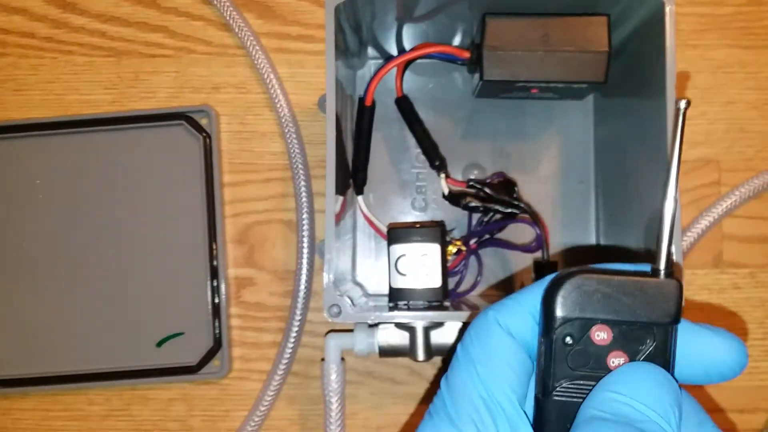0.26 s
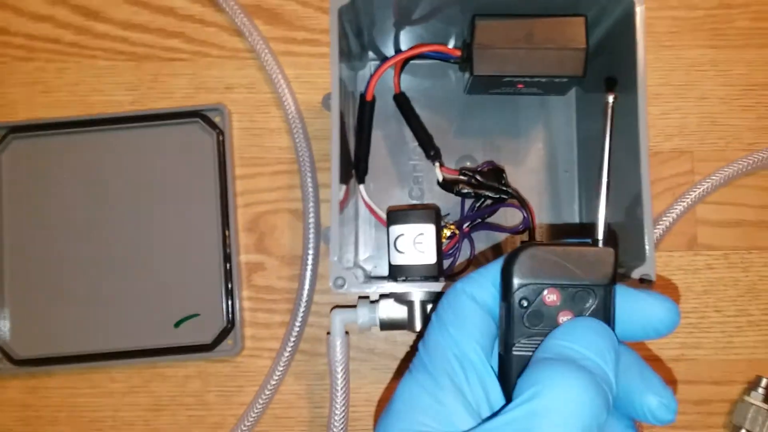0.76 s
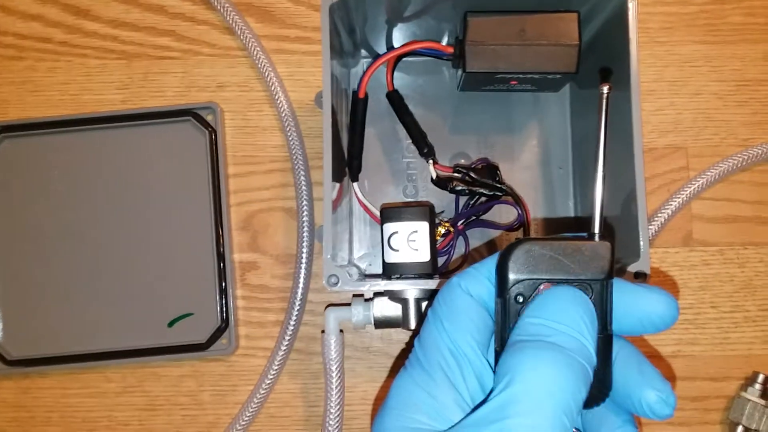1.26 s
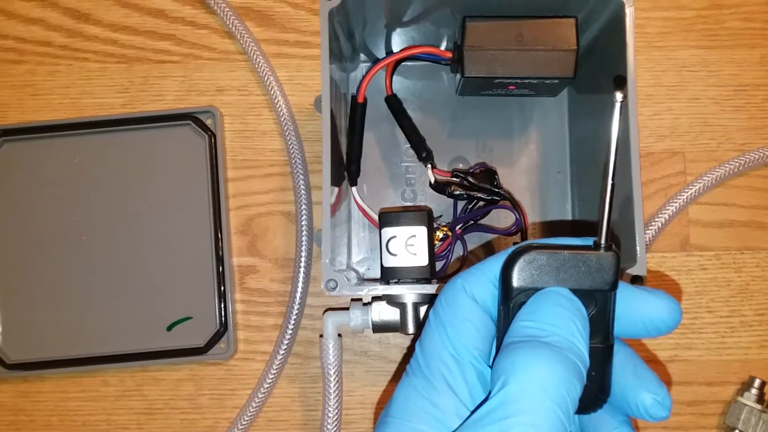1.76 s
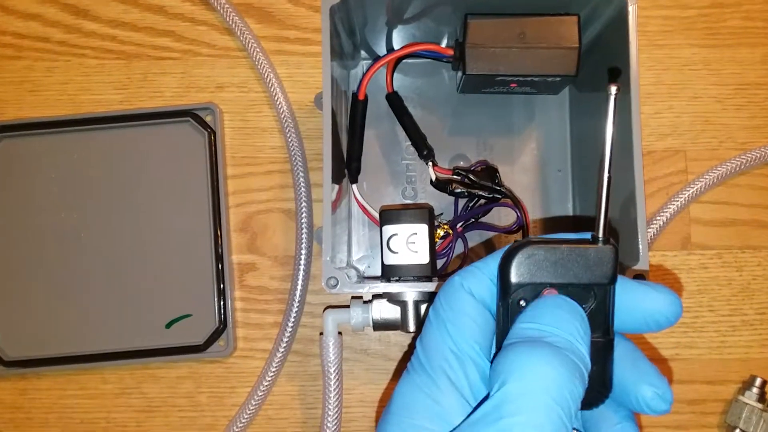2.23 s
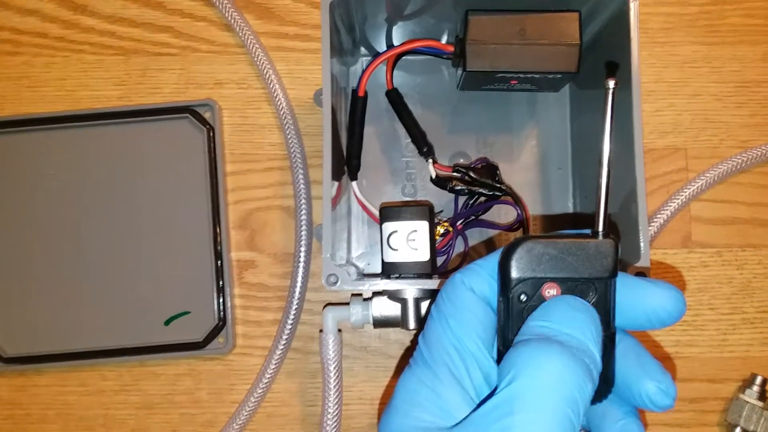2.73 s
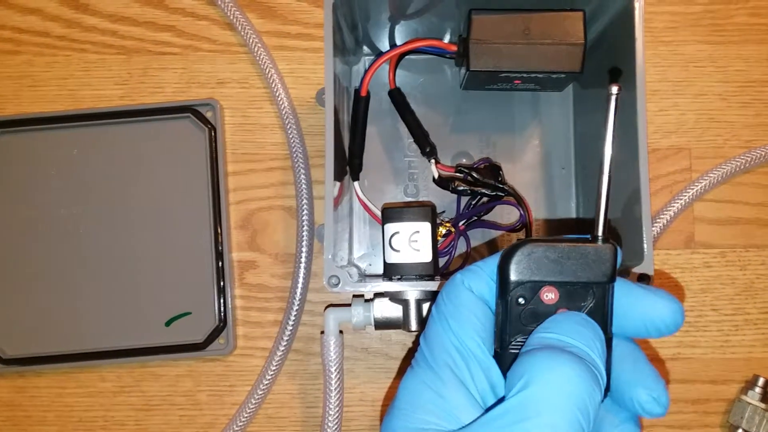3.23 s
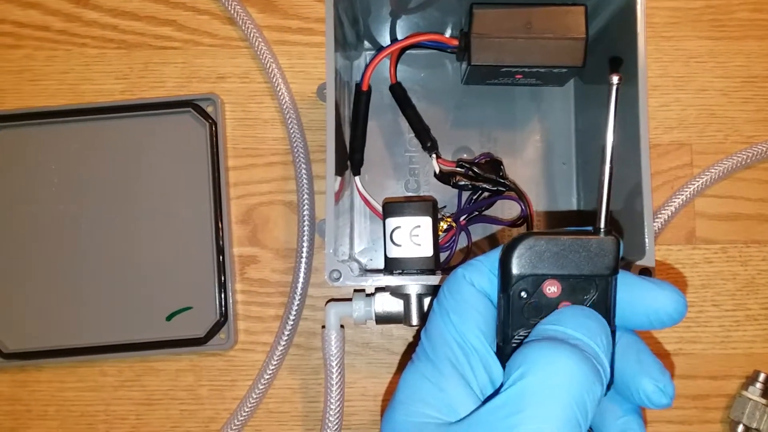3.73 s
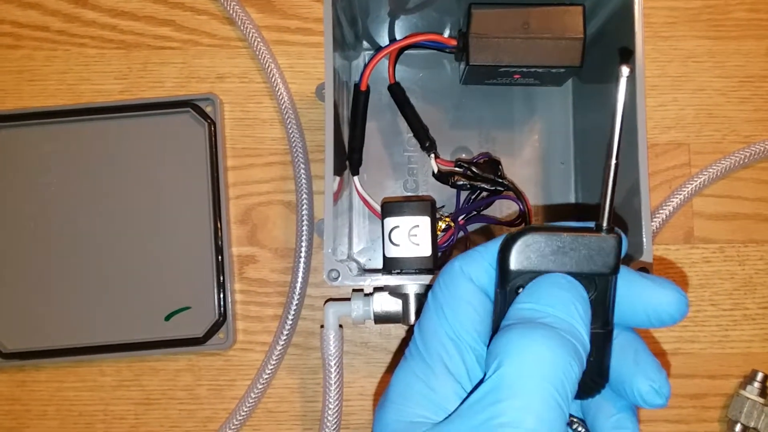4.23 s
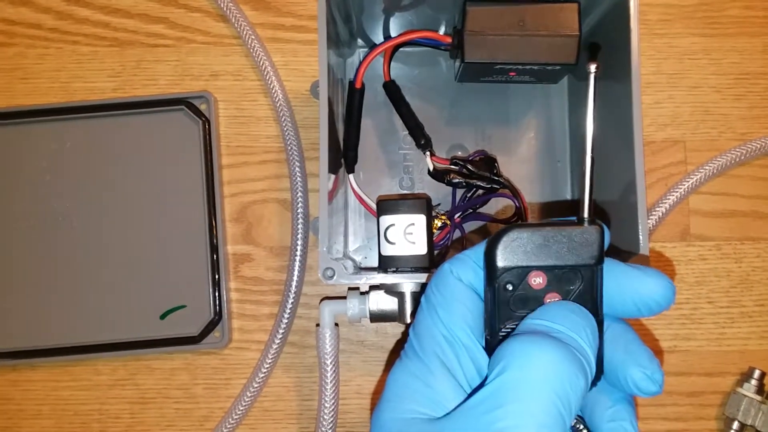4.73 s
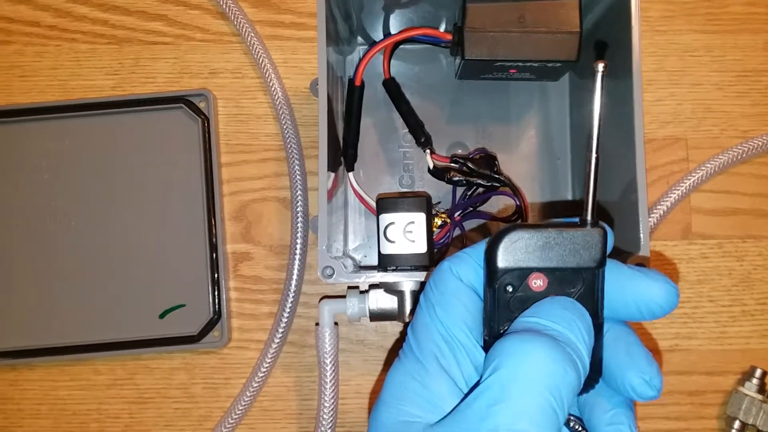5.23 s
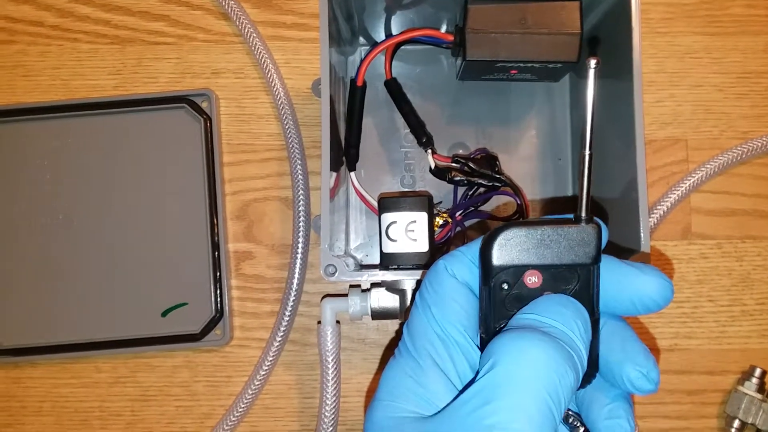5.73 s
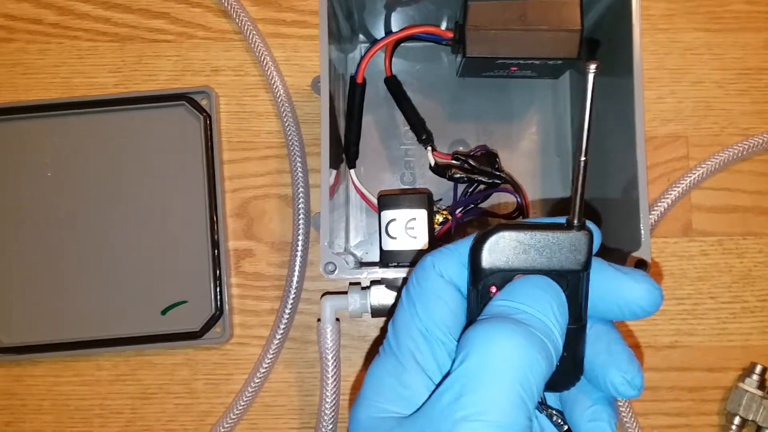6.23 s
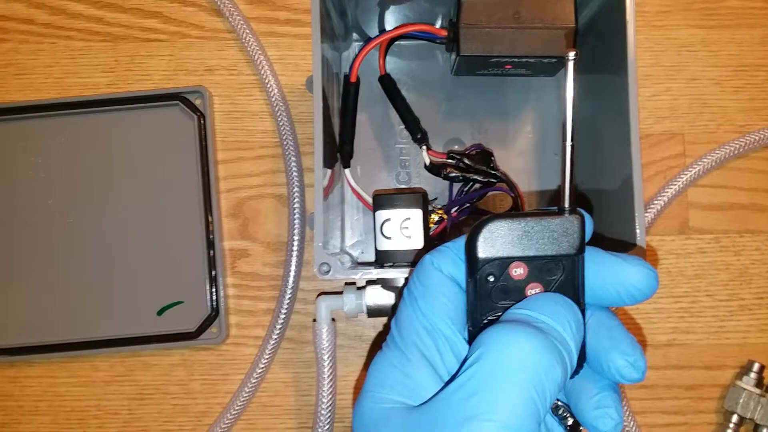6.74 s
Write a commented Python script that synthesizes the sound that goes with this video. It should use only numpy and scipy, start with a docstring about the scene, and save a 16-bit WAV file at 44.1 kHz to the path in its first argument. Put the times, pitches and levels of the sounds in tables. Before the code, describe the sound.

In a small quiet room with low rumble, faint hum and hiss, a gloved thumb presses a hollow plastic remote close to a stereo microphone. The first press gives only a click. Later presses trigger a relay and valve: a dry metallic clack on shutting, then a louder clack with a short sputtering air burst on opening. Shutting and opening alternate, ending with another air spit.

```python
"""Low rumble, mains hum and hiss come first, then the creaks of a glove close to a stereo microphone.
A gloved thumb clicks the buttons of a small remote over a workbench: dome ticks and case knocks.
A relay in an open plastic box answers and switches a solenoid valve, both made of ringing modes and noise:
it shuts with a dry clack and opens with a clack and a short spit of compressed air, shaped noise.
A small room rings after all but the background, the bench echo and the puff on the microphone."""
import sys
import numpy as np
from scipy import signal
from scipy.fft import rfft, irfft, next_fast_len
from scipy.io import wavfile
from scipy.ndimage import uniform_filter1d, map_coordinates

SR = 44100
rng = np.random.default_rng(int(sys.argv[2]) if len(sys.argv) > 2 else 0)


def master(y):
    """Save y as 16-bit WAV."""
    cut = np.clip(np.atleast_2d(y).T, -1, 1)
    pcm = np.round(cut * 32767)  # scale
    wavfile.write(sys.argv[1], SR, pcm.astype(np.int16))


N = 307773

# the remote's hollow plastic case: (frequency [Hz], relative level [dB])
CASE_SPECTRUM = [(200, -35.5), (600, -43.5), (950, -29.5), (1180, -15), (1350, -6), (1750, -1.5),
                 (1870, -2.5), (2000, 3), (2200, 2), (2450, -3.5), (2750, -16), (4000, -27), (7000, -44.5),
                 (16000, -52.5)]
# steel on steel: (frequency [Hz], relative level [dB])
STEEL_SPECTRUM = [(300, -14.5), (900, -10.5), (1600, 1.5), (4000, 2.5), (6000, -2), (9000, -7),
                  (11000, -12), (13000, -15), (16000, -23)]
# the valve body and the box it is bolted to: (frequency [Hz], relative level [dB], 60 dB decay [s])
VALVE_BOX_MODES = [(458, -10, .042), (505, -10, 0.05), (620, -17, 0.048), (980.7, -20.5, 0.093),
                   (1305, -7, 0.14), (1447, -10.5, 0.097), (1630, -7, 0.015), (1823, -6, .07),
                   (2125, -11, .03), (2533, -7, 0.08), (2696, -12, 0.036), (3760, 3, 0.033),
                   (3610, 1.5, 0.0085), (4270, -11.5, 0.0081), (4880, -21.5, 0.16), (5860, -5, 0.03)]
# the thumb slides onto a button, pushes it down and lets it spring back: (down [s], up [s],
# relative case knock [dB], tick down [dB], tick up [dB], slide [dB])
BUTTON_PRESSES = [(1.9199, 2.135, -13, -39.5, -49, -87), (3.0362, 3.1841, -10, -33, -38, -81.5),
                  (4.3465, 4.522, -8, -35, -36, -91.5), (5.3089, 5.5172, -10.5, -30, -34, -89),
                  (6.2617, 6.4345, -11, -35.5, -38.5, -92)]
# the relay pulls in and the valve opens: (time [s], relative force [dB], relative puff on the microphone [dB])
VALVE_OPENINGS = [(4.4141, -19.5, -5.5), (6.3296, -19, -20)]
# the relay drops out and the valve shuts: (time [s], relative force [dB])
VALVE_SHUTTINGS = [(3.0992, -20), (5.4013, -21)]
# the plunger lands after the relay: the coil pulls it fast, the spring returns it slowly
OPEN_TRAVEL_S, SHUT_TRAVEL_S = 0.0081, 0.0218


def amp(db):
    """Decibels to gain."""
    return 10 ** (np.asarray(db) / 20)


def unit(x):
    """Scaled to rms 1."""
    return x / np.sqrt(np.mean(x ** 2) + 1e-20)


def along(points, hz):
    """(frequency [Hz], value) points read on a log frequency axis."""
    f, v = np.transpose(points)
    return np.interp(np.log(hz + 1), np.log(f + 1), v)


def pan(db):
    """Left and right gains for a left-right difference."""
    return amp([[db / 2], [-db / 2]])


def clock():
    """Half a second of time, the life of one event."""
    return np.arange(SR // 2) / SR


def wander(t, rate):
    """Smooth random values at times t, drawn at this many new points a second."""
    points = rng.standard_normal(int(t[-1] * rate) + 4)
    return map_coordinates(points, [t * rate])


def add(track, s, x):
    """Mix x into the track at s seconds."""
    part = track[:, round(s * SR):][:, :x.shape[-1]]
    part += x[..., :part.shape[1]]


def filtered(x, response):
    """x times a complex response of frequency."""
    n = x.shape[-1]
    m = 2 * next_fast_len(n // 2 + SR // 8)  # room for the filter's tail
    return irfft(rfft(x, m) * response(np.fft.rfftfreq(m, 1 / SR)), m)[..., :n]


def coloured(x, spectrum):
    """x through the causal, minimum-phase filter that has this spectrum."""
    def response(hz):
        # folding the cepstrum onto positive times makes the filter causal
        cepstrum = irfft(np.log(amp(along(spectrum, hz))))
        cepstrum[1:len(hz) - 1] *= 2
        cepstrum[len(hz):] = 0
        return np.exp(rfft(cepstrum))
    return filtered(x, response)


def tilted(x, slope_db):
    """x made brighter or duller, approaching this many dB per octave above 1 kHz."""
    return filtered(x, lambda hz: amp(slope_db * np.log2(1 + hz / 1000)))


def burst(t60, alike):
    """Stereo noise that dies away; part of it is common to both sides."""
    noise = rng.standard_normal((3, SR // 2))
    share = np.clip(alike, 0, 1)
    stereo = np.sqrt(share) * noise[0] + np.sqrt(1 - share) * noise[1:]
    return stereo * amp(-60 * clock() / t60)


def sized(x, db):
    """A click whose energy equals 4 ms at this rms level."""
    energy = np.sum(np.mean(x ** 2, axis=0))
    return amp(db) * x / np.sqrt(energy / (.004 * SR))


def ring(modes, apart):
    """Struck modes at slightly new strengths; the two ports hear each one a little out of phase."""
    t, out = clock(), 0
    for hz, db, t60 in modes:
        phase = rng.uniform(0, 2 * np.pi) + apart * rng.standard_normal((2, 1))
        level = amp(db + rng.standard_normal() - 60 * t / t60)
        out = out + level * np.sin(2 * np.pi * hz * t + phase)
    return out * (1 - np.exp(-t / 0.00026))


def in_room(x, wet_db, early_db):
    """x with early reflections from bench and box, then the room's tail, both as decaying noise."""
    # how long the room rings: (frequency [Hz], 60 dB decay [s])
    room_decay = [(150, 0.13), (600, 0.53), (1500, 0.34), (3500, .35), (4900, 0.39), (6500, 0.4),
                  (15000, 0.19)]
    hz, t, z = signal.stft(rng.standard_normal((2, SR // 2)), SR, nperseg=256)
    decay = amp(-60 * t / along(room_decay, hz)[:, None])
    tail = signal.istft(z * decay, SR, nperseg=256)[1][:, :SR // 2]
    tail = tail * (1 - np.exp(-clock() / 0.0075))  # builds up more slowly than the early reflections
    early = burst(t60=0.032, alike=0.18) * (1 - np.exp(-clock() / 0.0015))
    answer = amp(wet_db) * tail / np.linalg.norm(tail[0])
    answer = answer + amp(early_db) * early / np.linalg.norm(early[0])
    return x + signal.fftconvolve(x.mean(0)[None], answer, axes=1)[:, :x.shape[1]]


def background():
    """Low room rumble and microphone hiss as shaped noise; a slightly unsteady hum as drifting sines."""
    # rumble and hiss: (frequency [Hz], relative density [dB per Hz])
    floor_spectrum = [(12, -47), (20, -15), (110, -2), (168, -12), (357, -20.5), (422, -24.5), (590, -25),
                      (759, -27.5), (5080, -41.5), (8410, -30), (12100, -33.5), (13900, -28), (16000, -36)]
    # how far the two ports agree: (frequency [Hz], left-right likeness [-1 to 1])
    floor_likeness = [(60, 0.84), (240, 0.83), (950, 0.015), (3770, -0.36), (15000, -0.02)]
    # the left port hisses more: (frequency [Hz], left-right difference [dB])
    port_balance = [(100, 2.5), (2000, -1), (4400, 0.5), (8100, 12), (15000, 13)]
    # hum: (frequency [Hz], relative level [dB])
    hum_tones = [(118.4, -60), (236.9, -72), (290.7, -75), (349.9, -76.5)]

    def mid_side(hz):
        turn = np.arccos(np.clip(along(floor_likeness, hz), 0, 1)) / 2  # likeness below 0 counts as 0
        return amp(along(floor_spectrum, hz)) * [np.cos(turn), np.sin(turn)]

    def balance(hz):
        lean = np.arctan(amp(along(port_balance, hz)))
        return np.sqrt(2) * np.array([np.sin(lean), np.cos(lean)])

    mid, side = filtered(rng.standard_normal((2, N)), mid_side)
    noise = amp(-61.0) * unit(np.array([mid + side, mid - side]))
    t, hum = np.arange(N) / SR, 0
    for hz, db in hum_tones:
        level = amp(db - 2 + 2 * wander(t, rate=4.2))
        hum = hum + level * np.sin(2 * np.pi * hz * t + 0.42 * wander(t, rate=2))
    return filtered(noise + hum, balance)


def rubs():
    """The creaks and the slide before each press: (time [s], level [dB], length [s], pitch [Hz])."""
    # the glove creaks on the remote's case: (time [s], level [dB], length [s], pitch [Hz])
    creaks = [(.129, -80.5, .053, 1930), (.847, -85, .15, 1350), (1.091, -78.5, .089, 1580),
              (1.624, -63, 0.026, 1700), (2.263, -61, 0.018, 1520), (4.302, -69, .016, 2050),
              (4.601, -44.5, 0.012, 1746), (6.046, -72, 0.04, 1750)]
    lead_s, slide_s, slide_hz = .4, 0.37, 1620  # the slide's start before the press, length, pitch
    return creaks + [(down - lead_s, db, slide_s, slide_hz) for down, *_, db in BUTTON_PRESSES]


def glove():
    """Rubber slips in tiny grains that sound through the remote's case."""
    out, t = np.zeros((2, N)), clock()
    for s, db, length, pitch_hz in rubs():
        grains = rng.standard_normal(len(t)) * amp(2.5 * wander(t, rate=250))
        slips = grains * np.sin(np.pi * np.minimum(t / length, 1))
        # a resonance at the pitch, and some scrape above 3 kHz
        creak = filtered(slips, lambda hz: 1 / (1 + 1j * (hz - pitch_hz) / 110) + .18 * (hz > 3000))
        rub = unit(coloured(creak, CASE_SPECTRUM)) * np.sqrt(length / t[-1])  # rms 1 over its length
        add(out, s, in_room(amp(db) * rub * pan(db=-12), wet_db=-10, early_db=-8.5))
    return out


def snaps():
    """Every movement of a button: (time [s], knock [dB], tick [dB], tick brightness [dB per octave])."""
    # the button rocks under the thumb: (time [s], relative case knock [dB])
    rocks = [(1.626, -40), (2.0502, -36), (2.921, -29)]
    press_slope_db = 1  # going down, the dome ticks brightly
    release_knock_db, release_slope_db = 6.5, -12.5  # springing back, it knocks harder and ticks duller
    rock_tick_db, rock_slope_db = -30, -5.5  # a rocking tick, set against its knock
    downs = [(s, knock, tick, press_slope_db) for s, _, knock, tick, _, _ in BUTTON_PRESSES]
    ups = [(s, knock + release_knock_db, tick, release_slope_db)
           for _, s, knock, _, tick, _ in BUTTON_PRESSES]
    return downs + ups + [(s, knock, knock + rock_tick_db, rock_slope_db) for s, knock in rocks]


def remote():
    """The dome ticks and knocks the hollow case, which the hand damps within a few cycles."""
    # the steel dome under a button: (frequency [Hz], relative level [dB])
    dome_spectrum = [(800, -38.5), (2500, -15.5), (4000, -1), (7000, -5.5), (10000, -7.5), (14000, -4),
                     (16000, -5.5)]
    bench_echo_s, bench_echo_db = .00132, -9  # the bench top throws the knock back
    out = np.zeros((2, N))
    knock = coloured(signal.unit_impulse(SR // 2), CASE_SPECTRUM)
    knock = knock / np.abs(knock).max()
    # nearer to the right port: one sample earlier there, and louder
    knock = np.array([np.roll(knock, 1), knock]) * pan(db=-9.5) * amp(-7.0)
    for s, knock_db, tick_db, slope_db in snaps():
        tick = coloured(burst(t60=0.0058, alike=0.18), dome_spectrum)
        tick = sized(tilted(tick, slope_db), tick_db)
        add(out, s, in_room(amp(knock_db) * knock + tick, wet_db=-13.5, early_db=-11.5))
        add(out, s + bench_echo_s, amp(knock_db + bench_echo_db) * knock)
    return out


def relay_blows():
    """The relay starts every switching: (time [s], level [dB], brightness [dB per octave])."""
    in_db, out_db = -3.5, -7  # set against the plunger
    in_slope_db, out_slope_db = 2, 1.24
    # dropping out, the armature bounces once, weaker and duller
    bounce_s, bounce_db, bounce_slope_db = .0026, -1, -4.5
    pulls = [(s, db + in_db, in_slope_db) for s, db, _ in VALVE_OPENINGS]
    drops = [(s, db + out_db, out_slope_db) for s, db in VALVE_SHUTTINGS]
    bounces = [(s + bounce_s, db + bounce_db, slope + bounce_slope_db) for s, db, slope in drops]
    return pulls + drops + bounces


def relay():
    """The armature lands, rings its modes and chatters; pulling in is brighter than dropping out."""
    # the relay's modes: (frequency [Hz], relative level [dB], 60 dB decay [s])
    relay_modes = [(450, -10, .03), (1280, -9, .018), (1800, -4, .022), (2080, -3, .018), (2630, -1, .014),
                   (3900, 3, .012), (4350, -3, .011), (5250, 1, .012), (5900, -7, .012), (7450, -2, .01),
                   (8200, 0, .01), (10900, -6, .009)]
    out = np.zeros((2, N))
    for s, db, slope_db in relay_blows():
        chatter = coloured(burst(t60=0.026, alike=0.25), STEEL_SPECTRUM)
        chatter = sized(tilted(chatter, slope_db=9.5), db=-2.0)
        ringing = sized(ring(relay_modes, apart=0.75), db=-1.5)
        click = sized(tilted(ringing + chatter, slope_db), db)
        add(out, s, in_room(click * pan(db=-4.0), wet_db=-12.0, early_db=-5.5))
    return out


def plunger_blows():
    """The plunger reaches its stop or its seat: (time [s], level [dB], brightness [dB per octave])."""
    open_slope_db, shut_slope_db = 4, -2
    stops = [(s + OPEN_TRAVEL_S, db, open_slope_db) for s, db, _ in VALVE_OPENINGS]
    return stops + [(s + SHUT_TRAVEL_S, db, shut_slope_db) for s, db in VALVE_SHUTTINGS]


def valve():
    """The plunger strikes and rattles briefly; valve body and box ring in their modes."""
    out = np.zeros((2, N))
    for s, db, slope_db in plunger_blows():
        bounces = burst(t60=.026, alike=.25) * (1 - np.exp(-clock() / .0006))
        rattle = sized(coloured(bounces, STEEL_SPECTRUM), db=-1.5)
        body = sized(ring(VALVE_BOX_MODES, apart=0.72), db=-0.5) * pan(db=-2.5)
        clack = sized(tilted(body + rattle, slope_db), db)
        add(out, s, in_room(clack, wet_db=-10.5, early_db=-8.5))
    return out


def air():
    """Pressure bursts out and drains: a sputtering hiss that rings the box, and a puff on the microphone."""
    # the air jet: (frequency [Hz], relative density [dB per Hz])
    jet_spectrum = [(100, -12.5), (400, -11), (800, -9), (1300, -1), (2400, 4.5), (3200, -2), (3800, 3.5),
                    (4900, 2.5), (6400, -12), (8200, -2), (11000, -4.5), (12800, 4.5), (14000, -2),
                    (16000, -7)]
    # (frequency [Hz], relative level [dB])
    box_spectrum = [(500, -22), (1000, -2.0), (2500, 0), (4000, -7.5)]
    eddy_spectrum = [(20, -15.0), (100, 0), (300, -2.5), (1000, -10), (8000, -72.0)]
    air_db = -8.5  # the same pressure escapes at every opening
    out, t = np.zeros((2, N)), clock()
    for relay_s, _, push_db in VALVE_OPENINGS:
        s = relay_s + OPEN_TRAVEL_S
        blast = (1 + 2.6 * np.exp(-(t / .0045) ** 2)) * (1 - np.exp(-t / .0007))
        sputter = amp(1.5 * wander(t, rate=350))
        flow = burst(t60=.28, alike=.1) * blast * sputter

        jet = sized(coloured(flow, jet_spectrum), db=-2.0) * pan(db=1.4)
        # the jet dulls as the pressure falls: its treble fades after 60 ms
        fizz = filtered(jet, lambda hz: 1 - 1 / (1 + (hz / 6000) ** 6))
        jet = jet - fizz * (1 - amp(-80 * np.maximum(t - .06, 0)))

        damped = ring(VALVE_BOX_MODES, apart=0.54) * amp(-250 * t)  # the rushing air shortens the ring
        box = signal.fftconvolve(flow, damped, axes=1)[:, :len(t)]
        box = sized(coloured(box, box_spectrum), db=-7.5) * pan(db=-5.0)
        add(out, s, in_room(amp(air_db) * (jet + box), wet_db=-5.5, early_db=-16))

        u = t / .0015
        puff = (1 - u / 2) * u * np.exp(1 - u)  # a push, then a slower suction
        eddies = sized(coloured(burst(t60=0.039, alike=0.55), eddy_spectrum), db=-20.5)
        gust = amp(push_db) * (0.92 * puff + eddies)
        add(out, s + 0.00086, gust * amp([[-22], [0]]))  # it hits the right port
    return out


def scene():
    """Everything on and around the bench, in stereo."""
    return background() + glove() + remote() + relay() + valve() + air()


def record(dry):
    """Gain control backs off just after a loud sound and recovers slowly; then the band limit."""
    power = np.abs(uniform_filter1d(np.mean(dry ** 2, axis=0), size=1024))
    excess_db = .5 * np.maximum(10 * np.log10(power + 1e-12) + 26, 0)  # half of what exceeds -26 dB
    recovery_db = 3.2 * np.arange(N) / SR  # 3.2 dB per second
    duck_db = np.maximum.accumulate(excess_db + recovery_db) - recovery_db
    attack = np.exp(-1 / (.06 * SR))  # 60 ms smoothing
    duck_db = signal.lfilter([1 - attack], [1, -attack], duck_db)
    return filtered(dry * amp(-duck_db), lambda hz: hz < 16250)


dry = scene()
out = record(dry)
master(out)
```